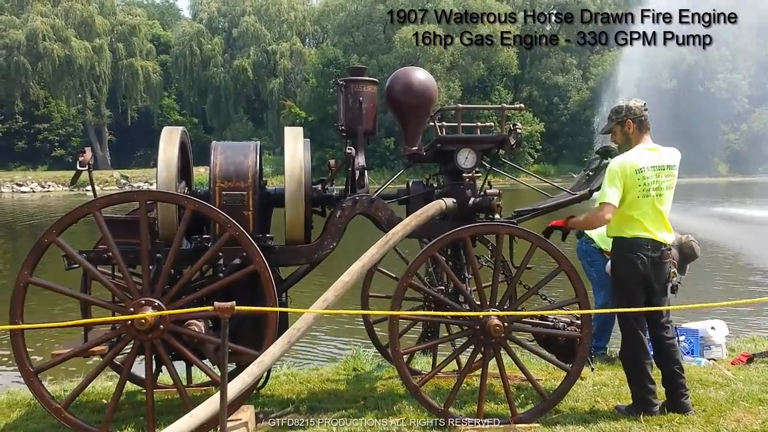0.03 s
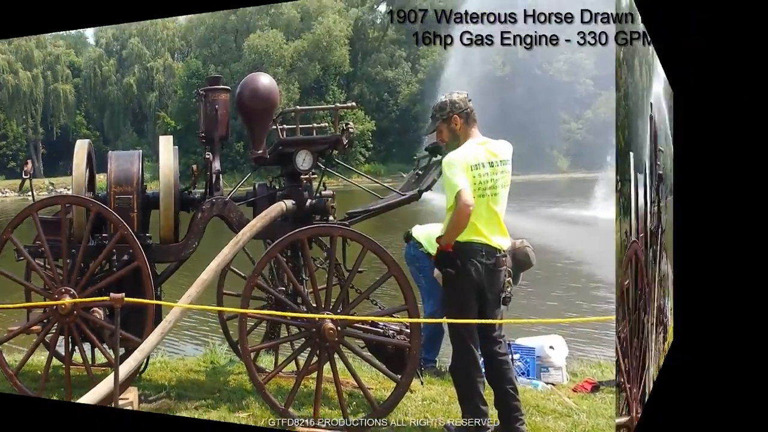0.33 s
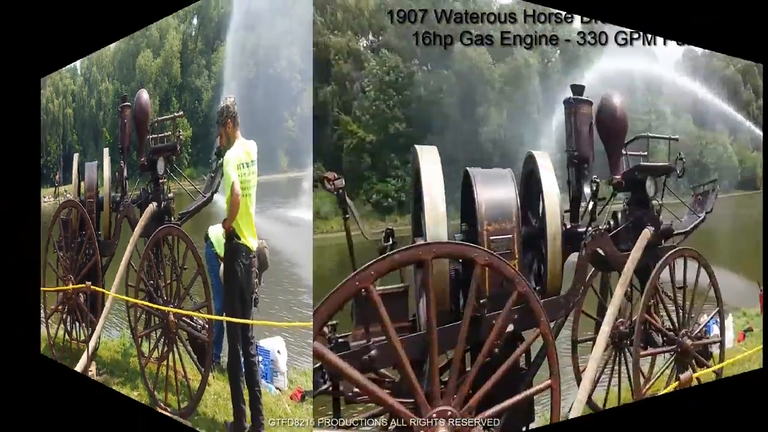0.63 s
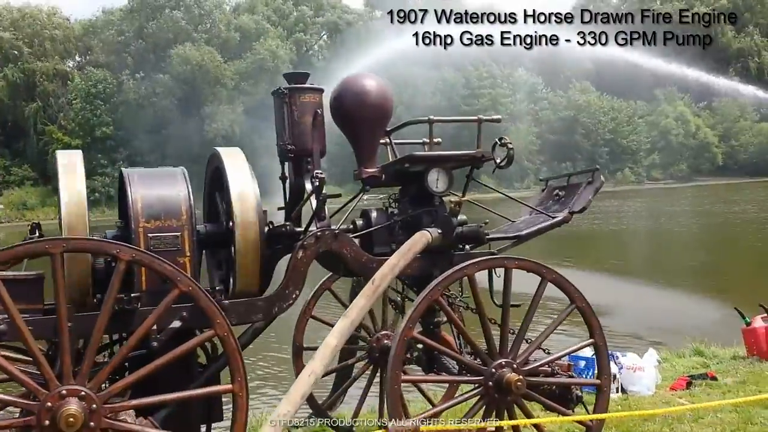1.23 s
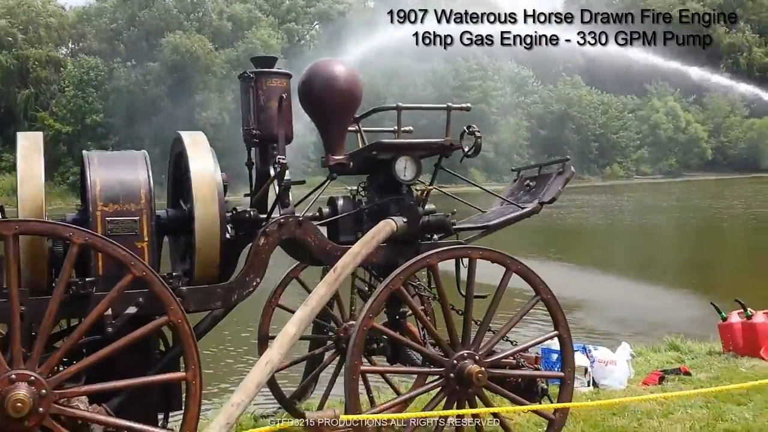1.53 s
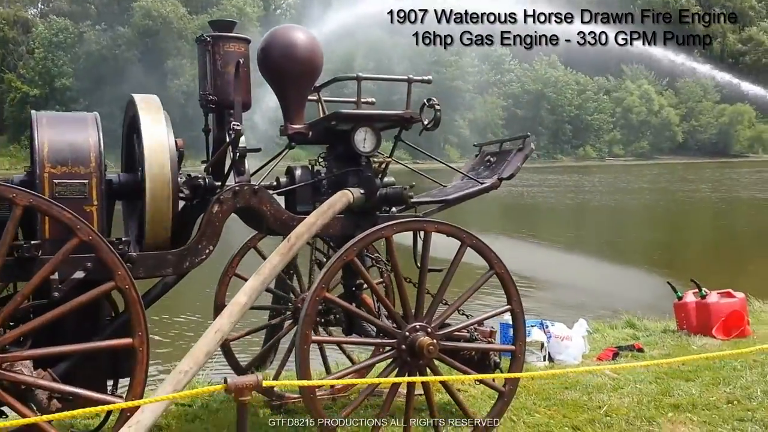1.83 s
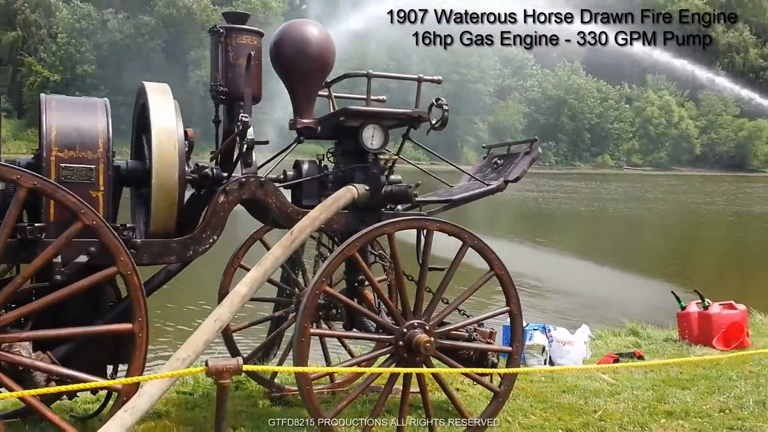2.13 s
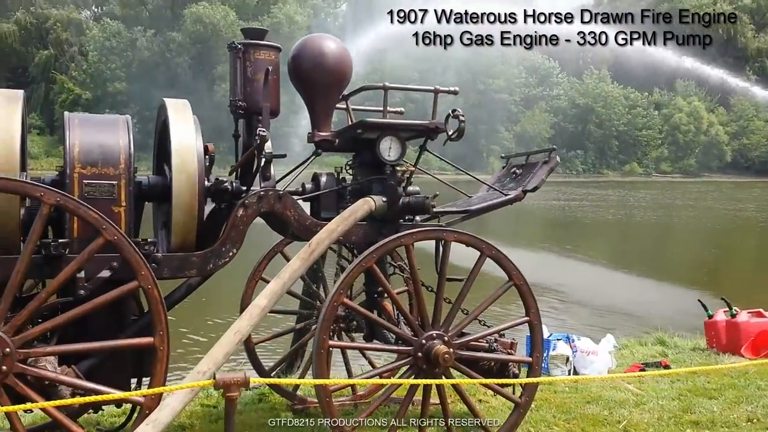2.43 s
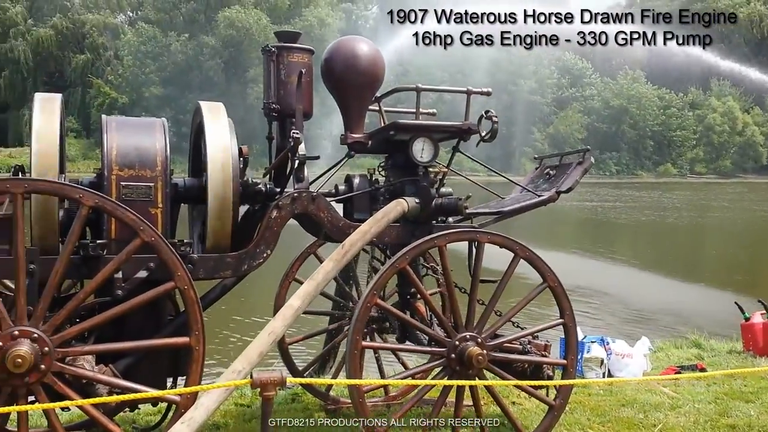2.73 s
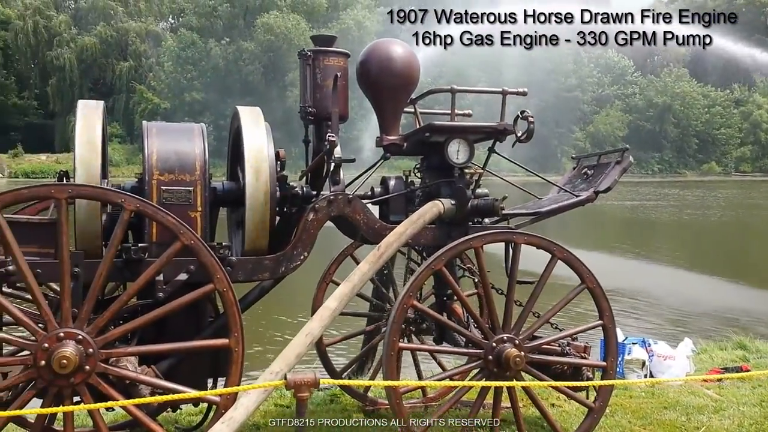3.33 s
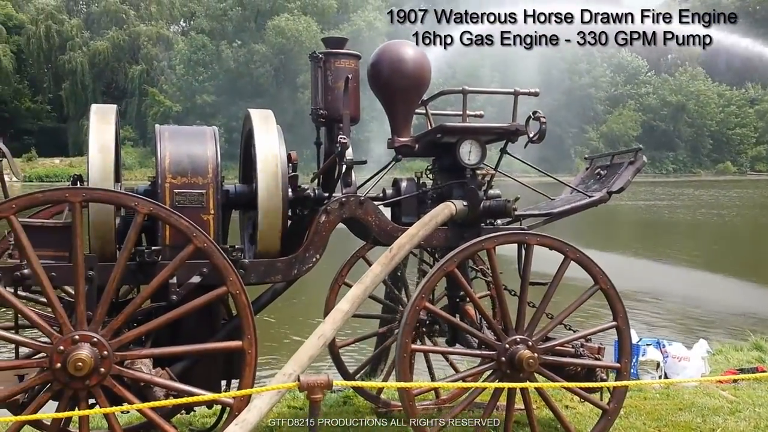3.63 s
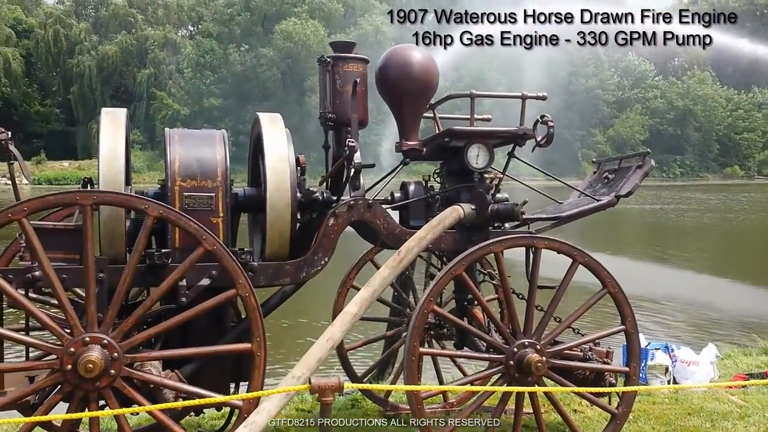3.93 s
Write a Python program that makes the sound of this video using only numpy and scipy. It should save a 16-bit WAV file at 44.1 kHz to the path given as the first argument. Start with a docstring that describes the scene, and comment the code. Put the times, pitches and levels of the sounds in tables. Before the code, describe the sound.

An old single-cylinder engine fires outdoors, first close up with rattling metal and pump clacks. After half a second of silence it fades in farther away, chugging evenly over rumble and spray while a splash of water swells and subsides.

```python
"""An antique single-cylinder gasoline engine drives a fire pump outdoors, heard first close by, in mono.
Over water spray and rumble the valve gear rattles; the exhaust opens with a push and a blast of gas,
then the pump clacks and hisses, a valve thumps and the intake gulps hollowly. At 0.43 s the sound stops.
After half a second of silence it fades in from farther off, in stereo, firing about three times a second
with a thin squeak in each cycle, while the splash of the falling jet swells and subsides."""
import sys
import numpy as np
from scipy import signal
from scipy.fft import rfft, irfft, next_fast_len
from scipy.io import wavfile
from scipy.ndimage import map_coordinates

SR = 44100
rng = np.random.default_rng(int(sys.argv[2]) if len(sys.argv) > 2 else 0)


def unload_audio(sound):
    """Save the sound as a 16-bit wav file, at the path given as the first command line argument."""
    columns = np.transpose(np.atleast_2d(sound))
    # keep every value between -1 and 1, then stretch to whole-number steps
    steps = np.round(np.clip(columns, -1, 1) * 32767)
    wavfile.write(sys.argv[1], SR, steps.astype(np.int16))


N = 176400


def amp(db):
    """Amplitude ratio: tenfold for every 20 dB."""
    return 10 ** (np.asarray(db) / 20)


def unit(x):
    """Normalisation to rms 1."""
    return x / np.sqrt(np.mean(x ** 2) + 1e-20)


def along(points, hz):
    """Interpolation of (frequency, value) points on a logarithmic frequency axis."""
    freqs, values = np.transpose(points)
    return np.interp(np.log(hz + 1), np.log(freqs + 1), values)


def since(start_s):
    """Time shift: seconds since start_s at every sample."""
    return np.arange(N) / SR - start_s


def flutter(depth_db, rate_hz):
    """Random amplitude modulation: a gain that wanders smoothly through rate_hz values a second."""
    knots = rng.standard_normal(int(N * rate_hz / SR) + 4)
    return amp(depth_db * map_coordinates(knots, [np.arange(N) * rate_hz / SR]))


def filtered(x, response):
    """Linear filtering: the spectrum is multiplied by a frequency response."""
    size = next_fast_len(N + SR // 4)
    return irfft(rfft(x, size) * response(np.fft.rfftfreq(size, 1 / SR)), size)[..., :N]


# likeness of left and right: frequency_hz, correlation
COHERENCE = [(40, .2), (80, 0.45), (160, 0.95), (400, 0.89), (1000, 1), (3000, 0.64), (7000, 0.37),
             (15000, 0.23)]
def noise(gain):
    """Partial coherence: mid and side noise, shaped by gain(hz), mix to a stereo pair of rms 1."""
    def response(hz):
        angle = np.arccos(np.clip(along(COHERENCE, hz), -1, .999)) / 2
        return gain(hz) * np.array([np.cos(angle), np.sin(angle)])
    mid, side = filtered(rng.standard_normal((2, N)), response)
    return unit(np.array([mid + side, mid - side]))


def rush(spectrum):
    """Broadband noise with a given spectral density."""
    return noise(lambda hz: amp(along(spectrum, hz)))


def resonant(modes):
    """Random forcing of damped resonators, whose powers add."""
    def gain(hz):
        power = sum((amp(db) * hz * width) ** 2 / ((centre ** 2 - hz ** 2) ** 2 + (hz * width) ** 2)
                    for centre, width, db in modes)
        return np.sqrt(power)
    return noise(gain)


def puff(start_s, length_s):
    """Critically damped pulse: it swells to 1 in half of length_s and falls more slowly."""
    envelope = np.zeros(N)
    span = np.arange(max(int(start_s * SR), 0), min(int((start_s + 10 * length_s) * SR), N))
    age = np.maximum(2 * (span / SR - start_s) / length_s, 0)
    envelope[span] = age * np.exp(1 - age)
    return envelope


def ring(start_s, hz, rise_s, t60_s):
    """Damped oscillation: one air resonance builds up and decays exponentially."""
    t = np.clip(since(start_s), 0, 1)
    return np.sin(2 * np.pi * hz * t) * (1 - np.exp(-t / rise_s)) * amp(-60 * t / t60_s)


def reflected(x, count=10, latest_s=.014, gain=.137):
    """Early reflections: flywheels, frame and ground return weak copies; the sum has rms 1."""
    impulse = np.zeros(SR // 10)
    impulse[0] = 1
    delays_s = rng.uniform(.002, latest_s, size=count)
    impulse[(delays_s * SR).astype(int)] = gain * rng.choice([-1, 1], size=count)
    return unit(signal.fftconvolve(x, impulse[None], axes=1)[:, :N])


# spectrum of the spray: frequency_hz, density_db
SPRAY_SPECTRUM = [(300, -14), (900, 0.5), (2000, -3), (4000, -5.5), (5300, -7), (6600, -3), (8300, -13),
                  (12000, -17), (15800, -25.5)]
def spray(level_db=-33):
    """Broadband noise: water spray hisses steadily, with a slight flutter."""
    return amp(level_db) * unit(rush(SPRAY_SPECTRUM) * flutter(1.1, 40) * flutter(1.5, 900))


# spectrum of the machine's rumble: frequency_hz, density_db
RUMBLE_SPECTRUM = [(20, -26), (45, -6), (70, 1.5), (130, 1.5), (190, 4), (270, -14), (420, -7), (900, -18),
                   (3000, -71.5)]
def rumble(level_db=-35):
    """Low-frequency noise: the running machine rumbles at a wavering level."""
    return amp(level_db) * unit(rush(RUMBLE_SPECTRUM) * flutter(2.5, 16))


# swell of the splashing water: time_s, level_db
SPLASH_SWELL = [(1.0, -34), (1.25, -26.5), (1.6, -36), (2.1, -38.5), (3.0, -42.5), (3.9, -37.5)]
# spectrum of the splash: frequency_hz, density_db
SPLASH_SPECTRUM = [(200, -23), (450, -1), (750, 1.5), (1400, -3.5), (2000, -12.5), (5000, -14),
                   (12000, -34)]
def splash():
    """Impact noise: the jet of water falls back onto the pond."""
    level_db = np.interp(since(0), *np.transpose(SPLASH_SWELL))
    return amp(level_db) * unit(rush(SPLASH_SPECTRUM) * flutter(2, 300))


# rattles of the valve gear: start_s, length_s, level_db
GEAR_RATTLES = [(.006, 0.022, -20), (.119, 0.014, -22.5), (.186, 0.0043, -17), (0.215, 0.0093, -19.5),
                (0.255, 0.0042, -23), (0.292, 0.007, -21), (0.399, 0.0092, -22)]
# spectrum of a rattle: frequency_hz, density_db
RATTLE_SPECTRUM = [(200, 0), (800, -4), (1250, 3), (1800, 3), (2800, -5), (4200, -6.5), (6000, 8.5),
                   (7500, 2), (10000, -14.5), (15800, -19.5)]
# resonances of the valve gear: centre_hz, width_hz, level_db
GEAR_MODES = [(1175, 17, 6.5), (1333, 71, 0.5), (1784, 63, 2), (2160, 74, -3.5), (2950, 90, -5),
              (5940, 330, -1), (6600, 92, -11)]
def valve_gear(ring_db=-5.5, steady_db=-30):
    """Modal ringing: the metal gear rings steadily, and louder with each short rattle."""
    shake = sum(amp(db) * puff(start, length) for start, length, db in GEAR_RATTLES)
    rattle = shake * unit(rush(RATTLE_SPECTRUM)[0] * flutter(1.5, 500))
    ringing = (amp(ring_db) * shake + amp(steady_db)) * resonant(GEAR_MODES)[0]
    return rattle + ringing


def loose_parts(per_s=22, centre_hz=6430, t60_s=.04):
    """Free vibration: loose steel parts clink faintly at random, each a decaying sine."""
    clinks = np.zeros(N + SR)
    t = np.arange(SR // 20) / SR
    for when, softness, pitch in rng.random((int(per_s * N / SR), 3)):
        hz = centre_hz * (1 + .18 * (2 * pitch - 1))
        db = -40 - 4.5 * np.log(softness + .046)  # many weak, a few stronger
        clinks[int(when * N):][:len(t)] += amp(db - 60 * t / t60_s) * np.sin(2 * np.pi * hz * t)
    return clinks[:N]


# openings of the exhaust valve: start_s, level_db
EXHAUST_OPENINGS = [(0.0671, -3), (0.352, -4.5), (1.122, -2.5), (1.4287, -1.5), (1.738, -0.5), (2.048, -1),
                    (2.3522, -1), (2.6601, -0.5), (2.9688, 0), (3.278, -0.5), (3.586, 0.5), (3.8935, 0)]
def exhaust_push(pitch_hz=155, width_s=.0041, gain_db=-13):
    """Pressure pulse: the valve opens with one low push, a sine under a Gaussian window."""
    pushes = np.zeros(N)
    for start, db in EXHAUST_OPENINGS:
        t = since(start)
        pushes += amp(db + gain_db) * np.sin(2 * np.pi * pitch_hz * t) * np.exp(-(t / width_s) ** 2)
    return pushes


# spectrum of the escaping gas: frequency_hz, density_db
BLAST_SPECTRUM = [(100, -11.5), (250, 0.5), (550, -6.5), (1250, -2.5), (1750, -9.5), (2700, -1),
                  (4000, -6.5), (5300, -8), (6700, -3.5), (8200, -8.5), (12000, -16.5), (15800, -22)]
# resonances of the silencer: centre_hz, width_hz, level_db
SILENCER_MODES = [(960, 130, -6), (1129, 61, 4.5), (1352, 28, 3.5), (1403, 55, 4.5), (2035, 60, 3),
                  (2180, 50, -2), (2420, 56, 0), (2645, 33, -7.5), (2710, 40, -0.5), (2962, 75, 2.5),
                  (3175, 18, 5.5), (4000, 40, -12), (4510, 100, -6), (5394, 70, -8), (5860, 20, -4.5),
                  (6590, 66, -2), (6790, 60, -2.5)]
def exhaust_blast(lead_s=.0081, rise_s=.017, hold_s=.0061, t60_s=.14, tail_t60_s=.23, gain_db=-14):
    """Turbulent excitation: gas tears through the silencer and sounds its resonances."""
    flow = np.zeros(N)
    for start, db in EXHAUST_OPENINGS:
        t = since(start - lead_s)
        attack = np.clip(t / rise_s, 0, 1) ** 1.6
        falling_s = np.maximum(t - rise_s - hold_s, 0)
        decay = amp(-60 * falling_s / t60_s)
        tail = amp(-8.5 - 60 * falling_s / tail_t60_s)
        flow += amp(db) * attack * np.hypot(decay, tail)
    gas = rush(BLAST_SPECTRUM) + amp(-1) * resonant(SILENCER_MODES)
    return amp(gain_db) * flow * reflected(gas * flutter(.67, 600))


# spectrum of low airflow, at exhaust and intake alike: frequency_hz, density_db
AIRFLOW_SPECTRUM = [(30, -26), (80, -7), (130, 0.5), (200, 3), (280, -6.5), (450, -23.5), (1200, -46.5)]
def afterflow(length_s=.056, gain_db=-30.5):
    """Turbulence: low noise trails each exhaust push."""
    flow = sum(amp(db + gain_db) * puff(start, length_s) for start, db in EXHAUST_OPENINGS)
    return flow * rush(AIRFLOW_SPECTRUM)


def chamber_ring(delay_s=.0064, pitch_hz=335, gain_db=-25.5):
    """Cavity resonance: the chamber rings after each push, at a slightly different pitch each time."""
    rings = np.zeros(N)
    for start, db in EXHAUST_OPENINGS:
        hz = pitch_hz * (1 + .051 * rng.normal())
        rings += amp(db + gain_db) * ring(start + delay_s, hz, rise_s=.00052, t60_s=.056)
    return rings


# pump strokes after each exhaust opening: delay_s, length_s, clack_db, hiss_db
PUMP_STROKES = [(.058, .016, -30, -39), (.085, .02, -31, -48), (.12, .034, -32, -37), (.158, .03, -33, -41),
                (.238, .016, -34, -46), (.258, .016, -30, -45)]
# resonances of the pump body: centre_hz, width_hz, level_db
PUMP_MODES = [(325, 100, -10), (454, 34, -2), (607, 53, 5), (720, 33, -4.5), (824, 55, 3), (932, 90, -12),
              (1210, 63, -4), (1388, 57, -2.5)]
# spectrum of the pump's hiss: frequency_hz, density_db
HISS_SPECTRUM = [(500, -9.5), (1400, 7.5), (2500, 2), (4500, 1), (6600, 4.5), (8500, -2.5), (12000, -14),
                 (15800, -13)]
def pump(scatter_s=.001, scatter_db=.86, steady_db=-38.5):
    """Forced vibration: the body sounds steadily, and strokes clack and hiss in every cycle."""
    clack, hiss = np.zeros((2, N))
    for start, _ in EXHAUST_OPENINGS:
        for delay, length, clack_db, hiss_db in PUMP_STROKES:
            late, size = rng.standard_normal(2)
            stroke = amp(scatter_db * size) * puff(start + delay + scatter_s * late, length)
            clack += amp(clack_db) * stroke
            hiss += amp(hiss_db) * stroke
    body = unit(resonant(PUMP_MODES) * flutter(2.1, 250))
    hiss_noise = unit(rush(HISS_SPECTRUM) * flutter(1.3, 400))
    return np.hypot(clack, amp(steady_db)) * body + hiss * hiss_noise


def valve_thump(delay_s=.0725, pitch_hz=153, gain_db=-10.5):
    """Damped resonance: a low valve thump follows each exhaust opening."""
    return sum(amp(db + gain_db) * ring(start + delay_s, pitch_hz, rise_s=.0065, t60_s=.052)
               for start, db in EXHAUST_OPENINGS)


# suction strokes: start_s, level_db, pitch_hz
INTAKE_GULPS = [(0.242, -16.5, 186), (1, -18.5, 180), (1.3176, -13.5, 183), (1.6239, -19.5, 183),
                (1.924, -19.5, 190), (2.2431, -15.5, 184), (2.549, -13, 180), (2.858, -17, 180),
                (3.159, -14, 186), (3.469, -16.5, 184), (3.7755, -16, 183)]
def intake(rise_s=.002, t60_s=.12, rebound_db=-7, draught_db=-19):
    """Air resonance: suction rings the intake twice, as the valve rebounds, and draws a draught."""
    tone, draught = np.zeros((2, N))
    for start, db, hz in INTAKE_GULPS:
        gulp = ring(start, hz, rise_s, t60_s)
        rebound = ring(start + 2 / hz, hz, rise_s, t60_s)  # two periods later, so in phase
        tone += amp(db) * (gulp + amp(rebound_db) * rebound)
        draught += amp(db + draught_db) * puff(start, length_s=.06)
    return tone + draught * rush(AIRFLOW_SPECTRUM)


def gear_clink(start_s=.25, length_s=.019, pitch_hz=5300, level_db=-22):
    """A single mode of vibration: the valve gear clinks once with a pure tone."""
    return amp(level_db) * puff(start_s, length_s) * np.sin(2 * np.pi * pitch_hz * since(start_s))


# squeaks of the running gear: start_s, level_db
GEAR_SQUEAKS = [(1.031, -30), (1.342, -29.5), (1.655, -38), (1.961, -31), (2.27, -31.5), (2.58, -37),
                (2.881, -33.5), (3.19, -44), (3.5, -33), (3.819, -31.5)]
def squeaks(length_s=.0103, pitch_hz=6600, width_hz=240):
    """Narrow-band noise: a thin squeak returns once a cycle."""
    envelope = sum(amp(db) * puff(start, length_s) for start, db in GEAR_SQUEAKS)
    return envelope * resonant([(pitch_hz, width_hz, 0)])


# tone colour close by: frequency_hz, gain_db
CLOSE_RESPONSE = [(50, -3.5), (100, 5), (180, 4.5), (300, 5.5), (420, -2.5), (580, 1.5), (850, -7),
                  (1250, -1), (2500, 7), (4500, 3.5), (6500, 9), (10000, 3.5), (15000, -0.5)]
def close_by(machine, cut_s=.433, fall_s=.0014):
    """Spectral colouring: the near machine sounds in mono with its valve gear, until the scene changes
    abruptly."""
    coloured = filtered(machine[0], lambda hz: amp(along(CLOSE_RESPONSE, hz)))
    gate = np.exp(-np.clip(since(cut_s) / fall_s, 0, 60))
    return (coloured + valve_gear() + gear_clink()) * gate


# stereo balance farther off: frequency_hz, left_minus_right_db
FAR_BALANCE = [(60, 3.5), (200, 1.5), (1000, 1.5), (2400, 4), (4400, 8), (7000, 13), (10000, -1),
               (15000, 2.5)]
def farther_off(machine, start_s=.9394, fade_per_s=1 / .27, left_lag_s=.0001):
    """Interaural level and time differences place the machine in stereo as it fades in."""
    sides = np.array([[.5], [-.5]])
    def response(hz):
        lag = np.exp(-2j * np.pi * hz * sides * left_lag_s)
        return amp(sides * along(FAR_BALANCE, hz)) * lag
    t = since(start_s)
    fade = (t > 0) * np.clip(.25 + fade_per_s * t, 0, 1)
    return filtered(machine, response) * fade


def scene():
    """Superposition: the sources add, heard close by and then, after a silence, from farther off."""
    engine = exhaust_push() + chamber_ring() + valve_thump() + exhaust_blast() + afterflow() + intake()
    machine = engine + loose_parts() + pump() + squeaks() + splash() + spray() + rumble()
    return close_by(machine) + farther_off(machine)


def record(dry, ceiling=.96, top_hz=15880):
    """Soft saturation rounds the highest peaks; a low-pass filter limits the band."""
    rounded = dry / (1 + np.abs(dry / ceiling) ** 10) ** (1 / 10)
    return filtered(rounded, lambda hz: np.clip((top_hz - hz) / 100, 0, 1))


dry = scene()
out = record(dry)
unload_audio(out)
```